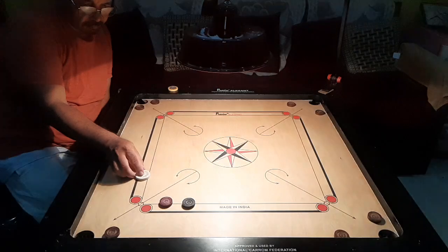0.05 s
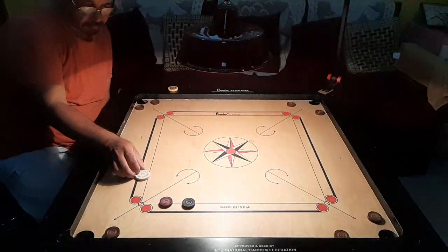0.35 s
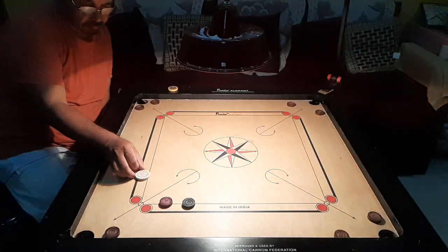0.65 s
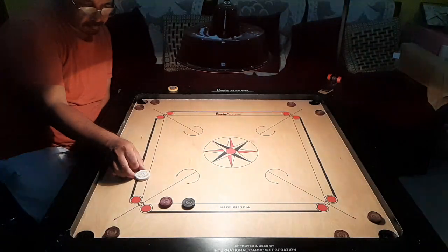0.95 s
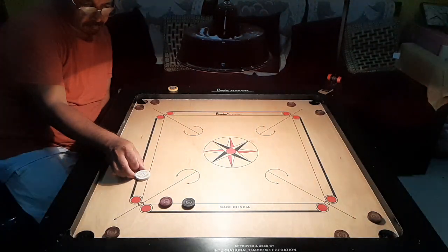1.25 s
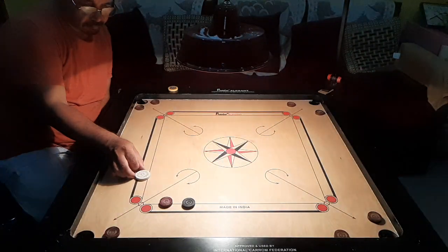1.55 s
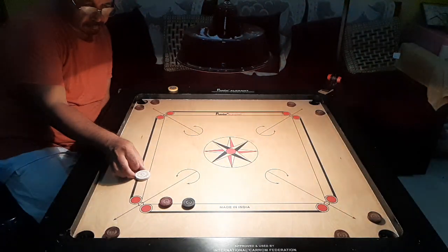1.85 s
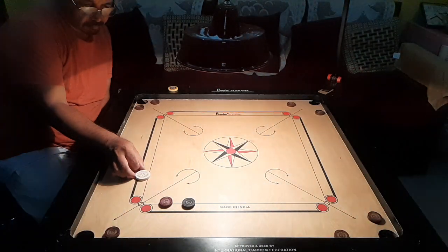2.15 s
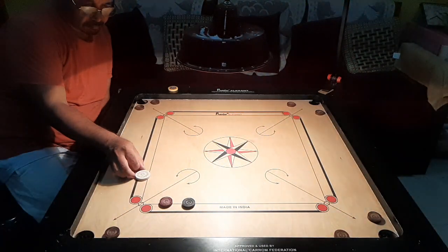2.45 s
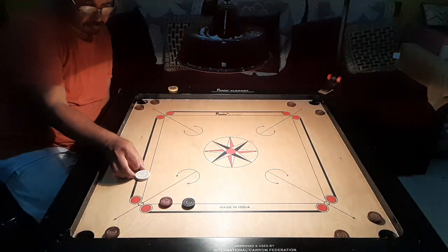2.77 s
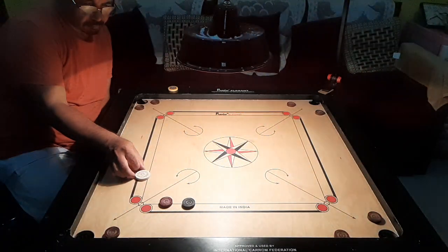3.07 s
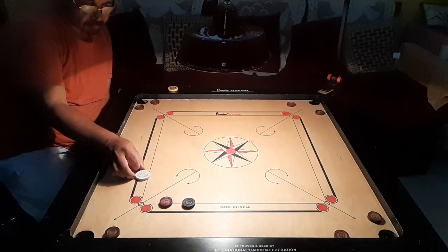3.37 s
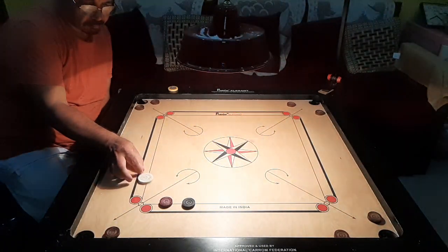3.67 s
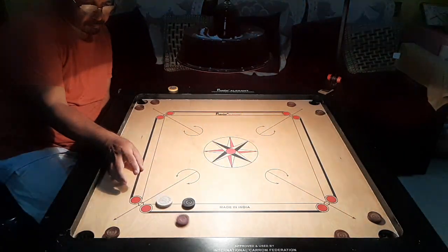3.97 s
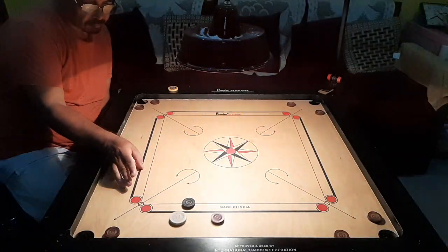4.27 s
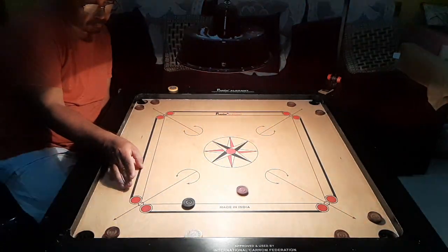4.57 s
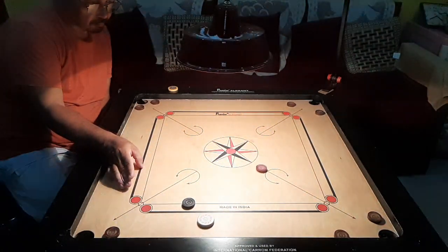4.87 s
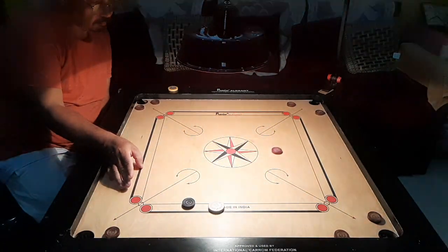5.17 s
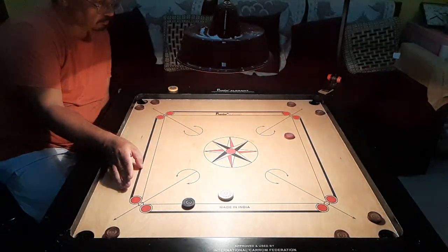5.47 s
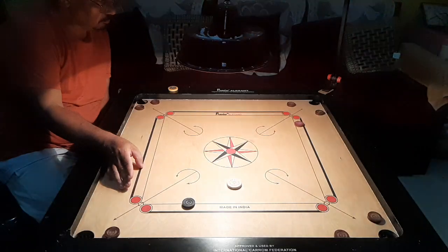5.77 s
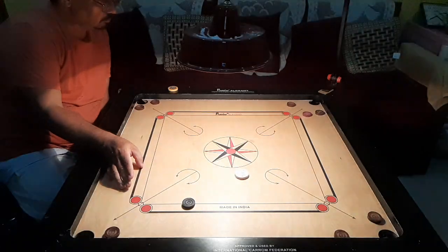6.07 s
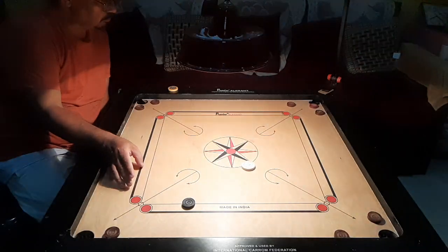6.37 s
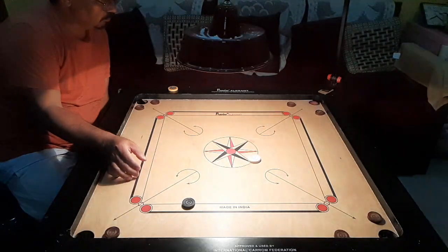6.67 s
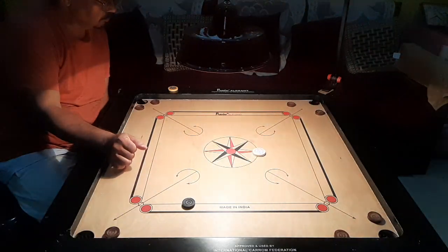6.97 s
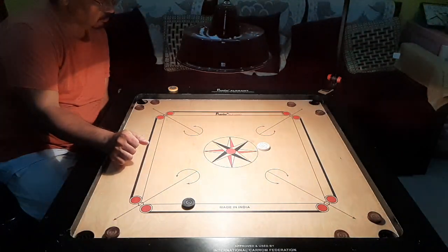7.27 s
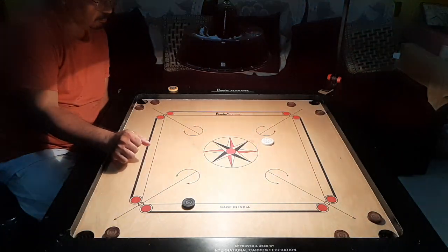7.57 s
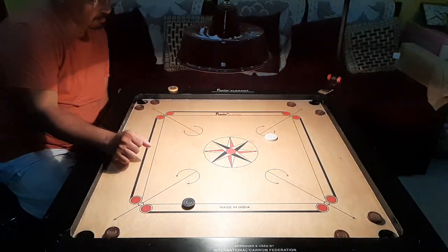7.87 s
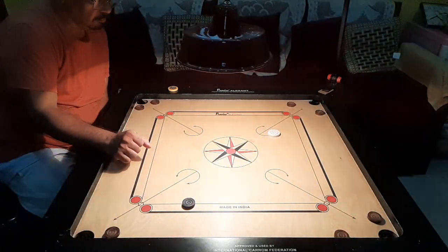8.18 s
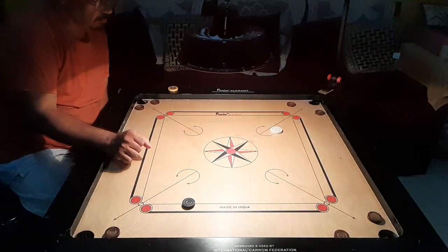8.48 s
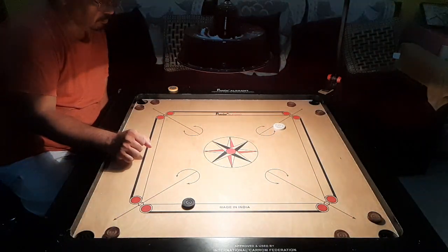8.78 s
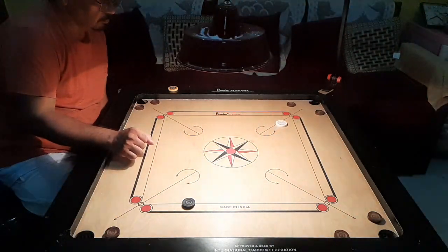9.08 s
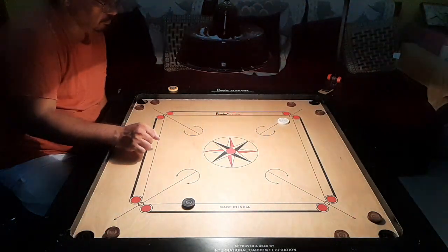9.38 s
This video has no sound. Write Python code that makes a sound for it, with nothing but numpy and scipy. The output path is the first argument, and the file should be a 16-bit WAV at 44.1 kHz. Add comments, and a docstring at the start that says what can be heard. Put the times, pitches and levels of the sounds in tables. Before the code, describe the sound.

Over low room rumble, a flicked striker and a disc clack around a wooden board, then the disc drops rattling into a pocket.

```python
"""A brief rush of noise ends in a snap, leaving a low room rumble with a few soft, deep thuds.
Then comes a carrom shot: the flicked striker clicks on a disc, both knock against the wooden frame,
and the disc slides off and rattles into a pocket. Each impact is a short elastic force pulse that
excites the board's modes and the bare room's reverberation; sliding friction adds a soft rub."""
import sys
import numpy as np
from scipy import signal
from scipy.fft import rfft, irfft, next_fast_len
from scipy.io import wavfile
from scipy.ndimage import uniform_filter1d

SR = 44100
rng = np.random.default_rng(int(sys.argv[2]) if len(sys.argv) > 2 else 0)


def unload_audio(sound):
    """Save the sound as a 16-bit wav file, at the path given as the first command line argument."""
    columns = np.transpose(np.atleast_2d(sound))
    # keep every value between -1 and 1, then stretch to whole-number steps
    steps = np.round(np.clip(columns, -1, 1) * 32767)
    wavfile.write(sys.argv[1], SR, steps.astype(np.int16))


N = 424683


def undb(db):
    """Decibels to amplitude ratio."""
    return 10 ** (np.asarray(db) / 20)


def unit_energy(x):
    """Normalise to a mean energy of one per channel."""
    return x / np.sqrt(np.mean(np.sum(x ** 2, axis=-1)))


def bins(size):
    """Fourier bin frequencies, kept above zero."""
    return np.maximum(np.arange(size // 2 + 1) * SR / size, 1)


def on_log_axis(points, hz):
    """Interpolate (frequency_hz, value) points over log frequency."""
    point_hz, value = np.transpose(points)
    return np.interp(np.log(hz), np.log(point_hz), value)


def ramp(seconds, length_s):
    """Linear rise from 0 to 1."""
    return np.clip(seconds / length_s, 0, 1)


def wander(rate_hz):
    """Slow random modulation: held values smoothed twice, spread near 1."""
    hold = int(SR / rate_hz)
    steps = np.repeat(rng.standard_normal(400), hold)[:N]
    return 1.1 * uniform_filter1d(uniform_filter1d(steps, hold), hold)


def resonance(hz, centre_hz, width_hz):
    """Frequency response of a damped harmonic oscillator."""
    return 1 / (1 + 1j * (hz ** 2 - centre_hz ** 2) / (hz * width_hz))


def minimum_phase(gain):
    """Causal response of a given magnitude, by folding the cepstrum."""
    cepstrum = irfft(np.log(gain))
    half = len(cepstrum) // 2
    cepstrum[1:half] *= 2
    cepstrum[half + 1:] = 0
    return np.exp(rfft(cepstrum))


def diffuse_field(gain, size, spacing_m=0.33):
    """Noise from all directions is coherent at two spaced microphones only at long wavelengths."""
    coherence = 0.72 * np.sinc(2 * bins(size) * spacing_m / 343)
    mid, side = rfft(rng.standard_normal((2, size)))
    mid, side = mid * np.sqrt(1 + coherence), side * np.sqrt(1 - coherence)
    return irfft(np.array([mid + side, mid - side]) * gain, size)


def steady_noise(colour):
    """Stationary diffuse noise of unit rms, its spectrum shaped by colour(hz)."""
    size = next_fast_len(N, True)
    noise = diffuse_field(colour(bins(size)), size)[:, :N]
    return noise / np.sqrt(np.mean(noise ** 2))


# Spectrum of the opening rush: frequency_hz, gain_db
RUSH_SPECTRUM = [(40, -17), (100, -1.5), (170, -17), (296, 2), (354, -4.5), (500, -2.5), (650, -7.5),
                 (1180, -11.5), (1550, -17.5), (2340, -22), (3200, -32), (5000, -35.5), (7900, -39.5),
                 (9000, -48), (15000, -57)]


def rush(start_s=0.0733, end_s=0.292, snap_s=0.2882):
    """Gated noise with a hollow resonance surges once and ends in a snap, an exponential pulse."""
    t = np.arange(N) / SR
    gate = ramp(t - start_s, 0.013) * ramp(end_s - t, 0.0051)
    surge_db = 4.5 * np.exp(-((t - 0.11) / 0.021) ** 2)
    noise = steady_noise(
        lambda hz: undb(on_log_axis(RUSH_SPECTRUM, hz)) * (1 + 0.27 * resonance(hz, 280, 55)))
    snap = (t > snap_s) * np.exp(-np.abs(t - snap_s) / 0.0004)
    return gate * undb(-37.5 + surge_db) * noise + undb(-31) * snap


# Spectrum of the room's background noise: frequency_hz, gain_db
RUMBLE_SPECTRUM = [(21, -10.5), (39, -10.5), (56, -11), (72, -6.5), (121, -3.5), (152, -8), (192, -8.5),
                   (272, -12.5), (346, -17.5), (492, -19.5), (846, -30.5), (1310, -37.5), (1960, -43),
                   (2410, -60.5), (3410, -72), (5010, -99)]
# Narrow droning bands within it: centre_hz, resonator_half_width_hz, level_db
DRONE_BANDS = [(71.6, 8.8, -57), (112.4, 9, -62.5), (283.6, 15, -68.5)]


def rumble(level_db=-52.5, hiss_db=-101):
    """Slow amplitude modulation makes the room's bass noise and drones waver over a faint hiss."""
    noise = undb(level_db) * steady_noise(lambda hz: undb(on_log_axis(RUMBLE_SPECTRUM, hz)))
    bass = signal.sosfiltfilt(signal.butter(2, 720, fs=SR, output="sos"), noise)
    out = noise + bass * (undb(3 * wander(rate_hz=9)) - 1)
    for centre_hz, half_width_hz, drone_db in DRONE_BANDS:
        gain = undb(drone_db + wander(rate_hz=5))
        out += gain * steady_noise(lambda hz: resonance(hz, centre_hz, 2 * half_width_hz) ** 2)
    return out + undb(hiss_db) * rng.standard_normal((2, N))


# Soft swells of deep bass: peak_s, half_width_s, level_db, pitch_hz
BASS_THUDS = [(0.108, 0.0052, -29, 84.1), (0.431, 0.028, -41, 32.86), (0.663, .065, -44.5, 33.5),
              (2.711, 0.2, -54, 28), (2.894, 0.036, -44.5, 40.6), (4.1, 0.46, -49.5, 67.7)]


def thuds():
    """Tone bursts: low sinusoids under Gaussian envelopes are heard as soft thuds."""
    t, out = np.arange(N) / SR, 0
    for peak_s, half_width_s, level_db, pitch_hz in BASS_THUDS:
        phase = rng.uniform(0, 2 * np.pi) + 0.3 * rng.standard_normal((2, 1))
        envelope = undb(level_db) * np.exp(-((t - peak_s) / half_width_s) ** 2)
        out += envelope * np.sqrt(2) * np.sin(2 * np.pi * pitch_hz * t + phase)
    return out


# Tone of the wooden knocks as heard: frequency_hz, gain_db
KNOCK_TONE = [(54, -20.5), (157, -4), (345, -7), (550, 0), (745, -3), (1118, -0.5), (1620, -1),
              (2035, -1.5), (2435, -14), (3245, -12), (4310, -19.5), (4965, -16), (5335, -48)]


def knock_tone(hz):
    """Spectral envelope of the knocks as heard: strong midrange, treble dulled by the recorder."""
    return undb(on_log_axis(KNOCK_TONE, hz))


# Glides of the striker, both pieces, then the disc alone: start_s, level_db, time_to_rest_s
SLIDES = [ (3.66, -69.5, 1.2), (3.98, -61.5, 3.5), (6.45, -69, 0.6)]


def sliding(rise_s=0.15):
    """Friction on the powdered board makes a low rub that fades as the pieces decelerate uniformly."""
    t = np.arange(N) / SR
    power = sum((undb(level_db) * ramp(t - start_s, rise_s) * ramp(start_s + rest_s - t, rest_s)) ** 2
                for start_s, level_db, rest_s in SLIDES)
    return np.sqrt(power) * steady_noise(lambda hz: knock_tone(hz) * resonance(hz, 460, 980) ** 2)


def contact_force(t, contact_ms, tick_db=-50.5):
    """Hertzian contact: a longer push has a duller spectrum; the hard edge adds a broadband tick."""
    push = np.sin(np.pi * np.minimum(t * 1e3 / contact_ms, 1)) ** 1.5
    return rfft(push) / push.sum() + undb(tick_db)


def direct_knock(blow, hz, left_lead_ms):
    """Direct sound from the wood at the contact point reaches the nearer microphone first."""
    delay_s = np.maximum([[-left_lead_ms], [left_lead_ms]], 0) / 1e3
    spectrum = blow * resonance(hz, 1260, 2300) * np.exp(-2j * np.pi * hz * delay_s)
    return unit_energy(irfft(spectrum)) * undb([[-1.0], [0.9]])


# Normal modes of board and frame: pitch_hz, level_db, t60_s
WOOD_MODES = [(176.2, 2.5, 0.4), (267.2, 2, 1.4), (422.5, 0.5, 0.92), (545.5, -5, 2), (583, -4, 1.9),
              (654, -3.5, 1.5), (680, -1.5, 0.77), (809, -0.5, 0.67), (857, -3, 1), (918, -3, 1.9),
              (996, -4.5, 1.2), (1072, 5, 1.1), (1127, -1, 1), (1166, -4, 1.7), (1214, -2.5, 1.1),
              (1356, -1.5, 1.2), (1525, 1, 1.25), (1640, -4, 1.9), (1925, -0.5, 2.1), (1953, 0.5, 1.1),
              (2240, -3.5, 0.6)]


def board_rings(t, count, channel_spread_rad=0.89):
    """Modal superposition: damped sinusoids, with new phases for each struck spot."""
    pitch_hz, level_db, t60_s = np.transpose(WOOD_MODES)
    modes = undb(level_db)[:, None] * np.exp(np.outer(2j * np.pi * pitch_hz - np.log(1000) / t60_s, t))
    shared = rng.uniform(0, 2 * np.pi, (count, 1, len(modes)))
    phases = shared + channel_spread_rad * rng.standard_normal((count, 2, len(modes)))
    return [unit_energy((np.exp(1j * phase) @ modes).imag) for phase in phases]


def early_reflections(t, rate_hz=600, t60_s=0.14):
    """Sparse echoes: the frame's reach both microphones, those of nearby things only one."""
    left, right, frame = (rng.random((3, len(t))) < rate_hz / SR) * rng.choice([-1, 1], (3, len(t)))
    decay = (t > 0.004) * np.exp(-np.log(1000) * t / t60_s)
    return unit_energy((np.array([left, right]) + 0.78 * frame) * decay)


# Reverberation time of the bare room: frequency_hz, t60_s
REVERB_TIMES = [(125, 3), (410, 1.76), (1010, 1.9), (2050, 1.89), (4400, 1.5)]


def room_tails(t, count):
    """Reverberation: dense reflections decay exponentially, each octave at its own rate."""
    centres_hz = np.geomspace(125, 4000, 6)
    octaves = np.array([np.interp(np.log(bins(len(t))), np.log(centres_hz), row) for row in np.eye(6)])
    build_up = 1 - np.exp(-t / 0.0043)
    decays = build_up * np.exp(-np.log(1000) * t / on_log_axis(REVERB_TIMES, centres_hz)[:, None])
    bands = irfft(rfft(diffuse_field(1, len(t))) * octaves[:, None])
    patterns = (np.roll(bands, k * len(t) // count, axis=-1) for k in range(count))  # one per impact
    return [unit_energy(np.sum(pattern * decays[:, None], axis=0)) for pattern in patterns]


# Finger on striker, striker on disc, disc on frame, striker on frame:
# start_s, reverb_energy_db, contact_ms, bass_cut_hz, direct_db, early_db, resonance_hz, lift_db
BOARD_HITS = [ (3.7355, -79, 0.71, 250, 1.5, -9, 602, 13), (3.9824, -51, 0.55, 174, -0.3, -11, 4540, 10),
              (4.2356, -42, 0.8, 120.3, -8, -7, 1150, 3.5),
              (4.7020, -42.5, 1.006, 118.6, -11.5, -8.5, 2070, 4.5)]
# The disc tips into the pocket and rattles to rest: start_s, reverb_energy_db, contact_ms, direct_db
POCKET_HITS = [(6.6653, -58, 0.96, -22), (6.7277, -47, 1.2, -7.5), (6.7784, -52, 1.12, -7.5),
               (6.794, -56.5, 0.85, -6), (6.8150, -55, 1.4, -2.5), (6.8674, -58.5, 1.27, -1),
               (7.1208, -61.5, 1.15, -16)]


def impacts(size=65536, ring_db=-5.5):
    """Linear superposition: each blow sounds directly, as board ring, as echoes and as reverberation."""
    t, hz = np.arange(size) / SR, bins(size)
    tone = minimum_phase(knock_tone(hz))
    count = len(BOARD_HITS) + len(POCKET_HITS)
    tails_and_rings = zip(room_tails(t, count), board_rings(t, count))
    out = np.zeros((2, N + size))

    def strike(start_s, energy_db, contact_ms, cut_hz, direct_db, early_db, own_hz, lift_db, lead_ms):
        """Source and filter: the knock tone and the struck part's resonance shape the contact force."""
        bass_cut = (1j * hz / (cut_hz + 1j * hz)) ** 2  # small pieces move little air
        struck_part = 1 + (undb(lift_db) - 1) * resonance(hz, own_hz, 0.24 * own_hz)
        blow = contact_force(t, contact_ms) * tone * bass_cut * struck_part
        paths = (*next(tails_and_rings), early_reflections(t))
        room, ring, early = (unit_energy(irfft(blow * rfft(path))) for path in paths)
        knock = direct_knock(blow, hz, lead_ms)
        sound = room + undb(ring_db) * ring + undb(early_db) * early + undb(direct_db) * knock
        start = int(start_s * SR)
        out[:, start:start + size] += undb(energy_db) * np.sqrt(SR) * sound  # 0 dB: unit rms for 1 s

    for hit in BOARD_HITS:
        strike(*hit, lead_ms=0.4)  # to the left
    for start_s, energy_db, contact_ms, direct_db in POCKET_HITS:  # one hollow, to the right
        strike(start_s, energy_db, contact_ms, cut_hz=530, direct_db=direct_db, early_db=-8,
               own_hz=664, lift_db=3.5, lead_ms=-0.28)
    return out[:, :N]


def scene():
    """Sound pressures add: the room's background and the carrom shot."""
    return rush() + rumble() + thuds() + sliding() + impacts()


def record(dry, silence_s=0.07, top_hz=15600):
    """Gating and band limiting: the sound fades in after a brief silence, its top treble cut."""
    fade_in = ramp(np.arange(N) / SR - silence_s, 0.01)
    return signal.sosfilt(signal.ellip(8, 0.2, 70, top_hz, fs=SR, output="sos"), dry * fade_in)


dry = scene()
out = record(dry)
unload_audio(out)
```